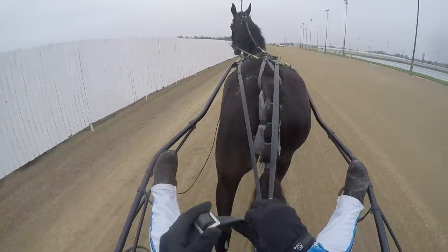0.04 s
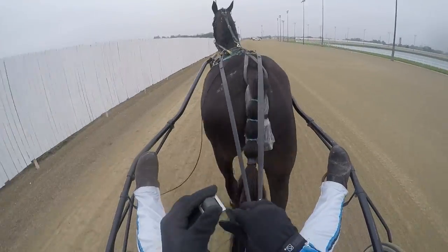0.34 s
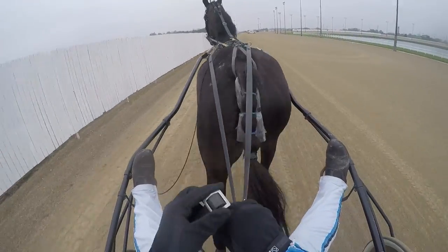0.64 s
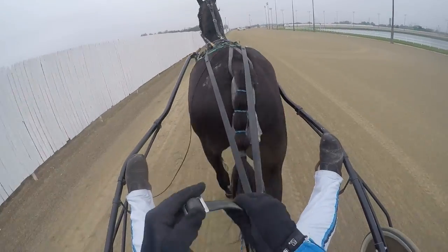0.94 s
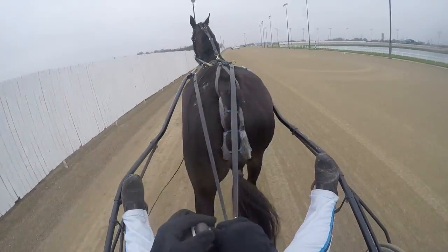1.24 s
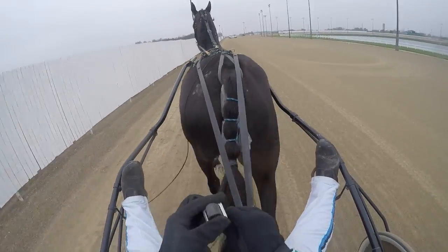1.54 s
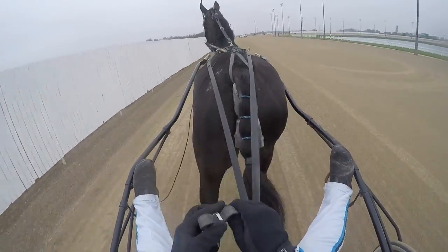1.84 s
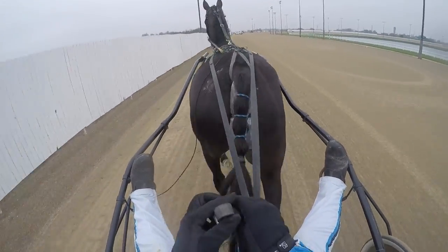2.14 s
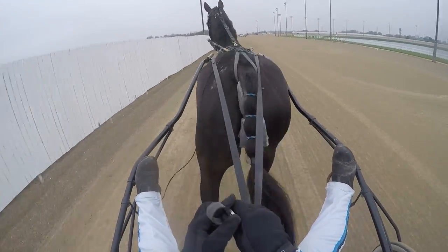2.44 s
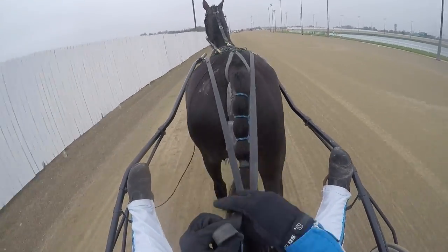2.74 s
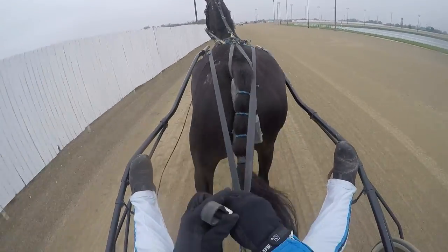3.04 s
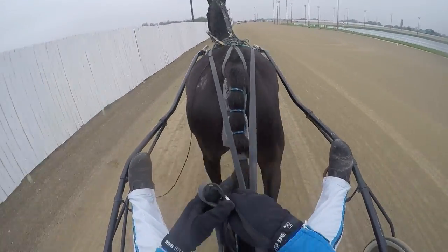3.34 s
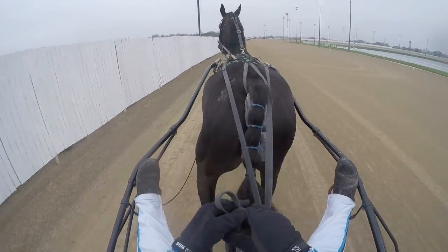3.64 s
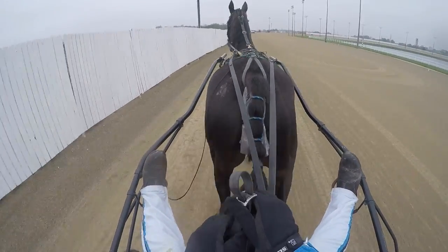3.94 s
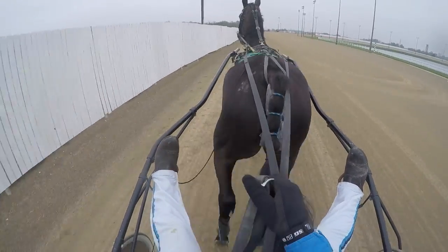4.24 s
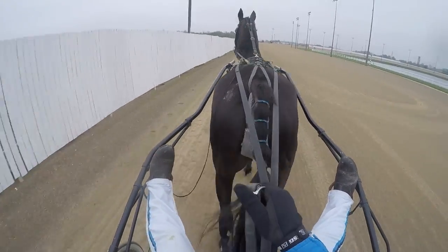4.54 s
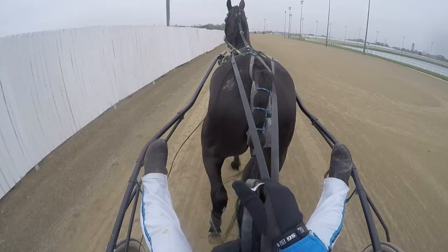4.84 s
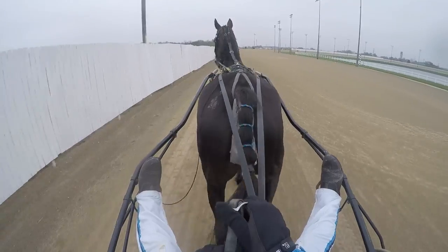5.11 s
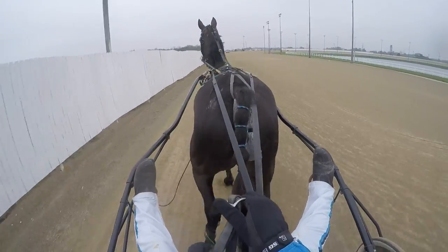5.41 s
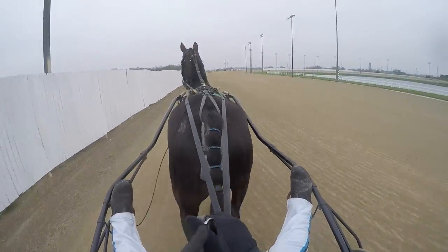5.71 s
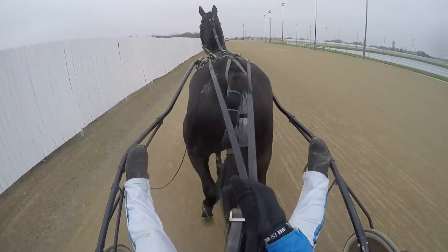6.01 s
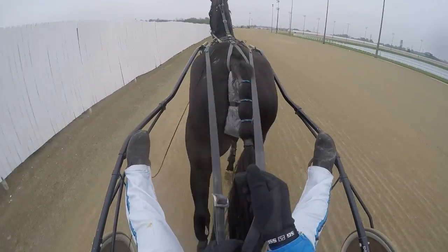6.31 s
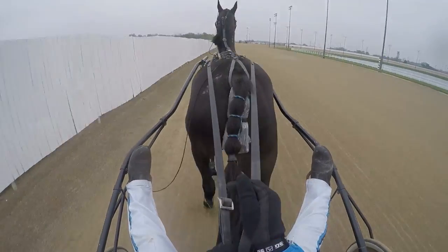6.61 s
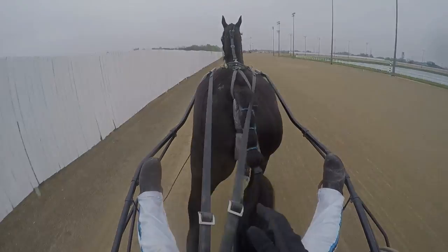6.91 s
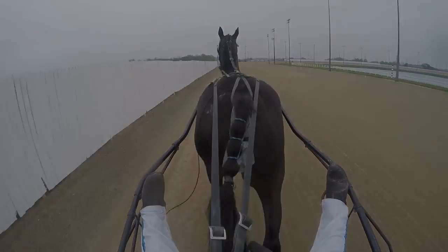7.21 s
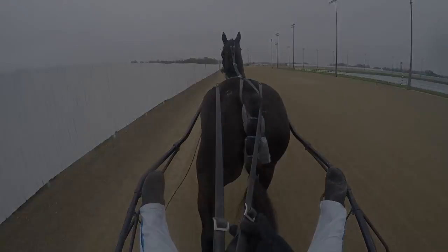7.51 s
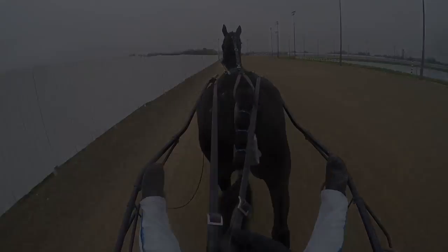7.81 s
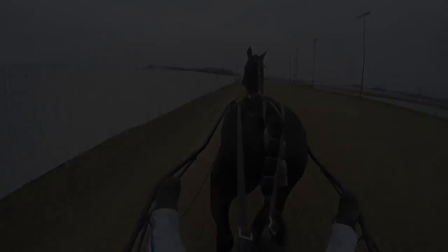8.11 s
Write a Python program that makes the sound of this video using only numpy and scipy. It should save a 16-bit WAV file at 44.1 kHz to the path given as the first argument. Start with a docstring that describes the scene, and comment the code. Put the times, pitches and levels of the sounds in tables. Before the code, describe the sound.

Steady hoofbeats on dirt, clicking harness and gritty wheels under low wind rumble, heard from a cart behind the horse, then fading out.

```python
"""A harness horse jogs along a dirt track, heard from the cart just behind it.
From the start, wind rumbles on the microphone, wheels crunch over sand, and hooves knock and spray grit
in an even beat while buckles and reins click. Three soft bumps come in the first second or so.
From about 3 s, hollow rasps join the stride, and the hoofbeats grow a little quicker and louder.
From about 7 s, everything fades away."""
import sys
import numpy as np
from scipy import signal
from scipy.fft import rfft, irfft, next_fast_len
from scipy.io import wavfile
from scipy.ndimage import uniform_filter1d

SR = 44100
rng = np.random.default_rng(int(sys.argv[2]) if len(sys.argv) > 2 else 0)


def int16_out(signal):
    """Quantize to a 16-bit WAV file."""
    q = np.round(np.clip(np.atleast_2d(signal).T, -1, 1) * 32767)
    wavfile.write(sys.argv[1], SR, q.astype(np.int16))


N = 364262
TIME = np.arange(N) / SR


def gain_of(db):
    """Turns decibels into a multiplier. Every 'fade' below is the time a sound takes to drop 60 dB."""
    return 10 ** (np.asarray(db) / 20)


def unit_power(x):
    """Scales a sound so that its average power is 1."""
    return x / np.sqrt(np.mean(x ** 2) + 1e-20)


def unit_energy(x):
    """Scales a sound so that its total energy is 1."""
    return x / np.linalg.norm(x)


def tone_db(tone, hz):
    """Looks up how strong each frequency is in a tone table."""
    freqs, db = np.transpose(tone)
    return np.interp(np.log(hz + 1), np.log(freqs + 1), db)


def gain_curves(rows):
    """Joins the points of each dB column into a gain that changes over time."""
    times, *columns = np.transpose(rows)
    return [gain_of(np.interp(TIME, times, db)) for db in columns]


def add(mix, start_s, sound):
    """Mixes a sound in at the given time."""
    part = mix[max(round(start_s * SR), 0):][:len(sound)]
    part += sound[:len(part)]


def hump(t, middle_s, length_s):
    """A smooth rise to 1 and back down."""
    return np.exp(-(2 * (t - middle_s) / length_s) ** 2)


def coloured(x, tone):
    """Gives a long sound the tone in a table, at power 1."""
    size = next_fast_len(N)
    shape = gain_of(tone_db(tone, np.fft.rfftfreq(size, 1 / SR)))
    return unit_power(irfft(rfft(x, size) * shape, size)[:N])


def drift(rate_hz):
    """A wandering curve that heads for a new random value rate_hz times a second."""
    points = rng.standard_normal(8000)
    return unit_power(np.interp(TIME * rate_hz, np.arange(len(points)), points))


def grains(per_s, spread_db):
    """Scattered clicks of sand, a few of them large."""
    happens = rng.random(N) < per_s / SR
    size = gain_of(spread_db * np.minimum(rng.exponential(1, N), 4))
    return unit_power(happens * size * rng.choice([-1, 1], N))


def patchy(x, db):
    """Each grain and link rings at its own pitch, so narrow bands stand out for a moment."""
    bands = signal.stft(x, nperseg=256, noverlap=192)[2]
    patches = uniform_filter1d(rng.standard_normal(bands.shape), size=3, axis=0)  # smooth across pitch
    patches = unit_power(uniform_filter1d(patches, size=6, axis=1))  # and across time
    return signal.istft(bands * unit_power(gain_of(db * patches)), nperseg=256, noverlap=192)[1][:len(x)]


def strike(force, tone, split_hz, low_db, high_db, vary_db, size=8192):
    """A blow makes an object ring. Its lows and highs each get the energy of 20 ms at their level."""
    hz, blow = np.fft.rfftfreq(size, 1 / SR), rfft(force, size)
    chance = np.interp(hz, np.linspace(0, SR / 2, 70), rng.standard_normal(70))  # no two ring alike
    shape = gain_of(tone_db(tone, hz) + vary_db * chance)
    high_share = 1 / (1 + (split_hz / (hz + 1)) ** 8)
    gain = sum(gain_of(db) * part / np.sqrt(np.mean(abs(part * blow) ** 2))
               for db, part in ((low_db, shape * (1 - high_share)), (high_db, shape * high_share)))
    log_gain = np.log(np.r_[gain, gain[-2:0:-1]] + 1e-9)
    response = np.exp(np.conj(signal.hilbert(log_gain)))[:len(hz)]  # rings only after the blow
    return np.sqrt(0.02 * SR) * irfft(blow * response)


# How strong the wind is: t/s, rumble level/dB, flutter level/dB
WIND_LEVELS = [(0, -28, -58.5), (1.0, -28, -62), (1.5, -26.5, -53.5), (2.8, -27.5, -50.5),
               (4.0, -26.5, -53.5), (4.9, -26.5, -48.5), (5.8, -33.5, -47), (6.5, -27, -52.5),
               (6.95, -27.5, -45.5), (8.26, -30.5, -44.5)]
# Gusts (+) and lulls (-): middle t/s, rumble change/dB, flutter change/dB, length/s
GUSTS = [(0.2, -11.5, -7, 0.067), (0.444, -0.5, -8, 0.1), (0.66, -9.5, -5, 0.05), (0.855, 4.5, 13, 0.047),
         (1.149, -16.5, -6, 0.071), (1.671, -13, -6, 0.091), (2.213, -6, -8, 0.077), (2.842, 8, 7, 0.12),
         (2.974, -10.5, 2, 0.11), (3.466, 11.5, -8, 0.11), (3.607, -8.5, -3.5, 0.057), (4, 4.5, 6.5, 0.15),
         (4.134, -15, 1, 0.053), (4.19, 8.5, 4, 0.045), (4.267, -6, 5, 0.05), (4.34, 7.5, 5, 0.14),
         (4.472, -9.5, 5.5, 0.13), (4.684, -5, -13, 0.059), (5.001, 7.5, -1, 0.05), (5.138, 3.5, 6, 0.07),
         (5.288, -10, -0.5, 0.09), (5.438, 5.5, -1.5, 0.11), (5.972, -7, -0.5, 0.045), (6.565, 6, 2, 0.037),
         (6.693, -10, 0, 0.11)]
# Tones of the deep rumble and the lighter flutter: f/Hz, level/dB
RUMBLE_TONE = [(5, -26), (18, -4.5), (27, 0), (36, -6), (47, -8), (60, -20), (80, -29.5), (130, -46.5),
               (300, -82), (1500, -130)]
FLUTTER_TONE = [(30, -91), (70, -2), (130, 2), (190, -7), (250, -15.5), (450, -25.5), (1000, -62),
                (4000, -90)]


def wind(rumble_db=1, flutter_db=-1, lumpy_db=3):
    """Swirls of air buffet the microphone with a rumble and a flutter, as gusts come and go."""
    rumble_gain, flutter_gain = gain_curves(WIND_LEVELS)
    for middle_s, deep_db, light_db, length_s in GUSTS:
        swell = hump(TIME, middle_s, length_s)
        rumble_gain *= gain_of(deep_db * swell)
        flutter_gain *= gain_of(light_db * swell)
    rumble = coloured(rng.standard_normal(N), RUMBLE_TONE)
    power = uniform_filter1d(uniform_filter1d(rumble ** 2, size=3400), size=1800)
    rumble /= np.sqrt(power + 0.033)  # evens out the noise's own swells
    flutter = coloured(rng.standard_normal(N) * gain_of(lumpy_db * drift(rate_hz=35)), FLUTTER_TONE)
    return gain_of(rumble_db) * rumble_gain * rumble + gain_of(flutter_db) * flutter_gain * flutter


# Soft bumps on the camera mount: t/s, level/dB, f/Hz
BUMPS = [(0.21, -42.5, 172), (0.57, -46, 165), (1.200, -35.5, 161)]


def mount_bumps(swell_s=0.0046):
    """The bumped mount gives a few dull swings that quickly die down."""
    out, t = np.zeros(N), np.arange(4000) / SR
    for start_s, db, hz in BUMPS:
        swell = t / swell_s * np.exp(1 - t / swell_s)
        add(out, start_s, gain_of(db) * swell * np.sin(2 * np.pi * hz * t))
    return out


# Thin, sharp ticks of grit: t/s, level/dB
GRIT_TICKS = [(1.1079, -36), (1.9445, -42), (3.9464, -39), (4.168, -47), (5.4234, -32), (6.2971, -37),
              (6.5899, -37), (7.8126, -41)]


def grit_ticks(boost_db=3, fade_s=0.021, tail_db=-11, low_cut_hz=7000):
    """Single grains hit the camera case: a click with a tiny tail of hiss."""
    out, t = np.zeros(N), np.arange(500) / SR
    for start_s, db in GRIT_TICKS:
        tick = (t == 0) + gain_of(tail_db - 60 * t / fade_s) * rng.standard_normal(len(t))
        add(out, start_s, gain_of(db + boost_db) * tick)
    return signal.sosfilt(signal.butter(2, low_cut_hz, "high", fs=SR, output="sos"), out)


# Rasps in step with the stride: middle t/s, hollow level/dB, hiss level/dB, length/s
RASPS = [(2.792, -52, -55, 0.067), (4.507, -61, -59, 0.12), (5.19, -55.5, -55, 0.12),
         (5.764, -58.5, -51.5, 0.11), (6.153, -65, -55.5, 0.091), (7.047, -54, -53, 0.14),
         (7.57, -49.5, -52.5, 0.22), (8.177, -47, -48.5, 0.13)]
# Tones of a rasp's hollow part and its hiss: f/Hz, level/dB
HOLLOW_TONE = [(400, -12), (700, 1), (930, 9), (1100, 4), (1500, -32.5)]
HISS_TONE = [(1300, -20), (2150, 6), (2700, 2), (3500, -13), (5000, -52)]


def rasps(rough_db=2):
    """Rough noise swells and sinks in two broad bands, one hollow and one hissing."""
    out = np.zeros(N)
    noise = rng.standard_normal(N) * gain_of(rough_db * drift(rate_hz=150))
    hollow, hiss = coloured(noise, HOLLOW_TONE), coloured(noise, HISS_TONE)
    for middle_s, hollow_db, hiss_db, length_s in RASPS:
        out += hump(TIME, middle_s, length_s) * (gain_of(hollow_db) * hollow + gain_of(hiss_db) * hiss)
    return out


# Notes at which the cart's tubes and the harness metal ring: f/Hz, width/Hz, boost/dB
METAL_NOTES = [(1950, 53, 1.5), (2782, 133, 4.5), (3380, 120, 4.5), (5120, 120, 4), (5920, 160, 3),
               (6580, 180, 2), (8160, 320, 2.5), (9500, 110, 2.5), (10400, 480, 2.5), (12250, 200, 2)]


def cart_ring(sound, overall_db=-0.54):
    """The metal nearby rings along faintly with a sound."""
    rings = sum((gain_of(db) - 1) * signal.lfilter(*signal.iirpeak(hz, hz / width, SR), sound)
                for hz, width, db in METAL_NOTES)
    return gain_of(overall_db) * (sound + rings)


def grit_pings(flying_sand, db=-6, fade_s=0.011, db_per_octave=-4):
    """Flung grit pings on the metal, loudest when the sand flies thickest."""
    out, t = np.zeros(N), np.arange(1200) / SR
    for hz, _, _ in METAL_NOTES:
        octaves_up = np.log2(hz / METAL_NOTES[0][0])
        ping = gain_of(db_per_octave * octaves_up - 60 * t / fade_s) * np.sin(2 * np.pi * hz * t)
        out += signal.oaconvolve(grains(per_s=9, spread_db=5), ping)[:N]
    return gain_of(db) * flying_sand * unit_power(out)


# How loud the tyres are on the track: t/s, roll level/dB, crunch level/dB, fizz level/dB
TYRE_LEVELS = [(0, -64.5, -59.5, -63), (1.1, -65, -61, -72.5), (2.5, -62, -59, -62), (3.3, -57, -57.5, -67),
               (4.1, -63, -60, -65.5), (4.9, -57, -56, -65.5), (6.4, -62.5, -59, -66.5),
               (7.1, -56.5, -55, -66), (8.26, -55, -53.5, -62)]


def sand_gains(rise_s=0.0041, fall_s=0.11, kick_db=-7, surge_db=(1, 0.13, 1.5), spray_db=(-6.5, -0.5, -9)):
    """Gains of roll, crunch and fizz: the cart surges once a step, and each hoof throws sand twice."""
    spray, t = np.zeros(N), np.arange(SR // 2) / SR
    landing = (1 - np.exp(-t / rise_s)) * np.exp(-t / fall_s)
    push_off = gain_of(kick_db) * hump(t, middle_s=0.18, length_s=0.037)
    for start_s, *_, sand_db in HOOF_FALLS:
        add(spray, start_s, gain_of(sand_db) * (landing / landing.max() + push_off))
    steps = np.interp(TIME, [row[0] for row in HOOF_FALLS], np.arange(len(HOOF_FALLS)))
    surge = np.cos(2 * np.pi * (steps - 0.76))  # peaks about three quarters through each step
    return [np.hypot(tyres * gain_of(swing_db * surge), gain_of(share_db) * spray)
            for tyres, swing_db, share_db in zip(gain_curves(TYRE_LEVELS), surge_db, spray_db)]


# Tones of the sand's hollow roll, its crunch and the fizz of fine grains: f/Hz, level/dB
ROLL_TONE = [(120, -35), (250, 4), (450, 5), (530, -0.5), (720, -1), (920, 1.5), (1150, -0.5), (1400, -15),
             (2200, -53)]
CRUNCH_TONE = [(700, -17), (1400, -3.5), (1900, 3.5), (2400, 0.5), (2800, -1.5), (3030, -2.5), (3400, -1.5),
               (3900, -3.5), (4600, -13), (7000, -62)]
FIZZ_TONE = [(3000, -10.5), (4600, -5), (5200, 2.5), (6100, 1.5), (7400, -2.5), (8150, -1.5), (8900, -6.5),
             (10200, -6.5), (13000, -8), (15000, -10.5)]


def wheels_on_sand(gains, clod_strength=0.64, clod_s=0.0068):
    """Tyres crush clumpy sand and burst clods of dirt; the same noise serves for the hooves' spray."""
    out = np.zeros(N)
    shared_clumps = unit_power(drift(rate_hz=52) + drift(rate_hz=420))
    pops = grains(per_s=55, spread_db=1.6) ** 2
    clods = signal.lfilter([1], [1, -np.exp(-1 / (clod_s * SR))], pops)  # each pop dies away
    bursts = np.sqrt(1 + clod_strength * clods / clods.mean())
    layers = (ROLL_TONE, 0, 1.85, 1), (CRUNCH_TONE, 0, 1.5, bursts), (FIZZ_TONE, 0.5, 2, bursts)
    for gain, (tone, boost_db, clump_db, crackle) in zip(gains, layers):
        clumps = unit_power(shared_clumps + 1.26 * drift(rate_hz=83))
        sand = grains(per_s=4000, spread_db=3.5) + 0.71 * rng.standard_normal(N)
        out += gain * gain_of(boost_db) * coloured(sand * crackle * gain_of(clump_db * clumps), tone)
    return patchy(out, db=2)


# Buckles that ring briefly: t/s, level/dB, f/Hz, fade/s
CLINKS = [(0.1382, -24.5, 3830, 0.0057), (6.389, -35, 3330, 0.015), (6.979, -37, 6000, 0.017),
          (8.036, -29.5, 2820, 0.018)]


def buckle_clinks():
    """A struck buckle rings on one note until its strap stops it."""
    out, t = np.zeros(N), np.arange(3000) / SR
    for start_s, db, hz, fade_s in CLINKS:
        add(out, start_s, gain_of(db - 60 * t / fade_s) * np.sin(2 * np.pi * hz * t))
    return out


def harness_jerks(delays_s=(0.07, 0.2), scatter_s=0.017, low_db=-61, high_db=-67.5, fade_s=0.015):
    """The harness jerks twice after each hoof lands: faint clicks, as rows like HARNESS_CLICKS."""
    rows = []
    for landing_s, *_ in HOOF_FALLS:
        for delay_s in delays_s:
            start_s = rng.normal(landing_s + delay_s, scatter_s)
            rows.append((start_s, rng.normal(low_db, 0.5), rng.normal(high_db, 0.5), fade_s))
    return rows


# The louder clicks and scuffs of the harness: t/s, low level/dB, high level/dB, fade/s
HARNESS_CLICKS = [(0.0373, -53, -59, 0.031), (0.1379, -46, -75, 0.0038), (0.142, -45.5, -60, 0.043),
                  (0.485, -56.5, -60.5, 0.11), (0.585, -49, -53.5, 0.075), (0.8162, -60, -56, 0.13),
                  (0.8561, -57, -55.5, 0.041), (1.094, -52.5, -58, 0.041), (1.113, -55.5, -58.5, 0.056),
                  (1.181, -46.5, -48.5, 0.069), (1.2934, -56, -64, 0.036), (1.5073, -46.5, -48, 0.11),
                  (1.5823, -56, -56, 0.13), (1.744, -51.5, -62, 0.045), (1.779, -54, -57.5, 0.048),
                  (1.8705, -58, -62.5, 0.042), (2.0122, -51, -57.5, 0.052), (2.1325, -49, -52, 0.14),
                  (2.1618, -57, -51.5, 0.024), (2.3705, -47.5, -52, 0.085), (2.4252, -52.5, -77, 0.035),
                  (2.536, -49.5, -79, 0.064), (2.76, -57, -54.5, 0.097), (2.9088, -49.5, -61, 0.037),
                  (3.031, -58, -56, 0.038), (3.301, -61, -60, 0.034), (3.4867, -54, -59.5, 0.037),
                  (3.762, -50, -51, 0.15), (4.014, -57, -59, 0.04), (4.0375, -50, -54, 0.14),
                  (4.338, -52, -59, 0.11), (4.434, -52, -61, 0.028), (4.693, -51, -68, 0.054),
                  (4.8982, -49.5, -59, 0.072), (5.04, -57, -60.5, 0.059), (5.1716, -49, -59, 0.069),
                  (5.3495, -54.5, -59.5, 0.035), (5.419, -63, -55, 0.15), (5.589, -56, -55, 0.093),
                  (5.6292, -51.5, -57.5, 0.057), (5.8483, -50.5, -57, 0.023), (6.226, -50, -58.5, 0.053),
                  (6.2814, -53, -60, 0.072), (6.388, -48.5, -60, 0.061), (6.5207, -50.5, -64, 0.022),
                  (6.582, -60, -67, 0.048), (6.838, -45, -50.5, 0.065), (6.8594, -52, -57, 0.07),
                  (6.881, -52, -49, 0.083), (6.9462, -44.5, -72, 0.013), (6.971, -57, -84, 0.051),
                  (6.978, -42, -55.5, 0.025), (7.2178, -51, -68, 0.018), (7.5084, -40, -51.5, 0.097),
                  (7.9505, -55, -44, 0.089)]
# Tone of a buckle: f/Hz, level/dB
BUCKLE_TONE = [(300, -46), (1050, -4.5), (1380, -10.5), (1900, -0.5), (2450, -2), (3000, -1.5), (3750, 0),
               (4700, -12), (5600, -2.5), (7300, -11), (8100, -7), (8900, -17.5), (10200, -12),
               (15000, -30.5)]


def harness(rise_share=0.029, snap_s=0.033, tail_db=-23, tail_fade_s=0.34, slip_db=3.5, slip_hz=260):
    """Straps slide through buckles: short slides snap, long ones scrape in uneven slips."""
    out, t = np.zeros(N), np.arange(4500) / SR
    for start_s, low_db, high_db, fade_s in HARNESS_CLICKS + harness_jerks():
        fade_s = max(fade_s, 0.004)
        rise = 1 - np.exp(-t / (rise_share * fade_s))
        fall = gain_of(-60 * t / fade_s) + gain_of(tail_db - 60 * t / tail_fade_s)
        slips = gain_of(slip_db * np.interp(t * slip_hz, np.arange(100), rng.standard_normal(100)))
        scrape = unit_energy(rise * fall * slips * patchy(rng.laplace(size=len(t)), db=3.5))
        scrape[0] += 0.66 * min(snap_s / fade_s, 2)  # the opening snap
        click = strike(scrape, BUCKLE_TONE, split_hz=4380, low_db=low_db, high_db=high_db, vary_db=5)
        add(out, start_s, click)
    return out


# Hooves landing: t/s, thud level/dB, crack level/dB, soil crush against the knock/dB, sand level/dB
HOOF_FALLS = [(0.1374, -61, -69, 15, -76), (0.445, -50, -54.5, -8, -71), (0.7495, -51, -49, 2, -65),
              (1.0516, -47.5, -50.5, 3, -60), (1.3574, -52, -57, -6, -56),
              (1.6557, -43.5, -49, -0.5, -59.5), (1.9478, -46, -52, -3.5, -59.5),
              (2.2452, -43.5, -50, 0, -60), (2.565, -57, -70, -14, -57), (2.8306, -47, -49.5, 22, -57),
              (3.111, -48, -47.5, 13, -69), (3.4006, -41, -46.5, 1, -58), (3.69, -53, -50.5, 3, -53.5),
              (3.9778, -40.5, -50, 4, -61), (4.2587, -48, -47, 12, -58.5), (4.286, -49, -68, 0, -59),
              (4.5613, -47.5, -46, 0, -55), (4.8363, -46.5, -48, -4, -53.5), (5.132, -47, -45.5, 6, -54),
              (5.3974, -41, -44, -0.5, -55), (5.6934, -43.5, -48.5, 7, -53), (5.9637, -41.5, -44.5, 3, -54),
              (6.2507, -39.5, -43, -2.5, -55), (6.5266, -50, -48.5, 3, -52.5), (6.7957, -44, -46, 0.5, -53),
              (7.0689, -47.5, -43, 5, -69), (7.351, -45.5, -47, 6, -56.5), (7.644, -38, -47, 3, -55),
              (7.8984, -43, -47, 7, -54.5), (8.1934, -46, -46, 5, -52)]
# Tone of a hoof on dirt: f/Hz, level/dB
HOOF_TONE = [(60, -26), (200, -3.5), (360, -1), (520, -4.5), (700, -9.5), (1080, -5.5), (1380, -16),
             (1900, -3), (2400, -10.5), (3400, -8.5), (4600, -21), (5400, -20), (9000, -32), (15000, -42)]


def hooves(toe_db=-10, toe_s=0.012, crush_fade_s=0.086, spray_db=-16, spray_fade_s=0.053,
           heel_db=-15, heel_s=0.013):
    """The toe brushes the dirt, the hoof knocks, the soil crushes under it and the heel settles."""
    out, t = np.zeros(N), np.arange(-500, 6000) / SR  # the hoof lands at t = 0
    lead_s, after = -t[0], np.maximum(t, 0)
    toe = gain_of(toe_db) * np.exp(-abs(t) / toe_s)
    soil = gain_of(-60 * after / crush_fade_s) + gain_of(spray_db - 60 * after / spray_fade_s)
    for landing_s, thud_db, crack_db, crush_db, _ in HOOF_FALLS:
        grit = np.where(t > 0, soil, toe) * rng.laplace(size=len(t))
        force = gain_of(crush_db) * unit_energy(grit)
        add(force, lead_s, np.ones(1))  # the knock
        add(force, lead_s + heel_s * rng.uniform(0.93, 1.3), gain_of([heel_db]))
        clop = strike(force, HOOF_TONE, split_hz=1460, low_db=thud_db, high_db=crack_db, vary_db=3.5)
        add(out, landing_s - lead_s, clop)
    return out


def scene():
    """Mixes everything into one channel, close by and in the open air."""
    roll, crunch, fizz = sand_gains()
    clatter = hooves() + harness() + wheels_on_sand([roll, crunch, fizz]) + grit_pings(fizz)
    return (cart_ring(clatter) + buckle_clinks() + rasps() + grit_ticks() + mount_bumps() + wind())[None]


def record(dry, fade_start_s=6.815, fade_length_s=1.675, high_cut_hz=15200):
    """Turns the ending steadily down and cuts off the highest treble."""
    faded = dry * np.clip(1 - (TIME - fade_start_s) / fade_length_s, 0, 1)
    treble_cut = signal.firwin(511, high_cut_hz, window=("kaiser", 9), fs=SR)
    return signal.oaconvolve(faded, treble_cut[None], "same")


dry = scene()
out = record(dry)
int16_out(out)
```